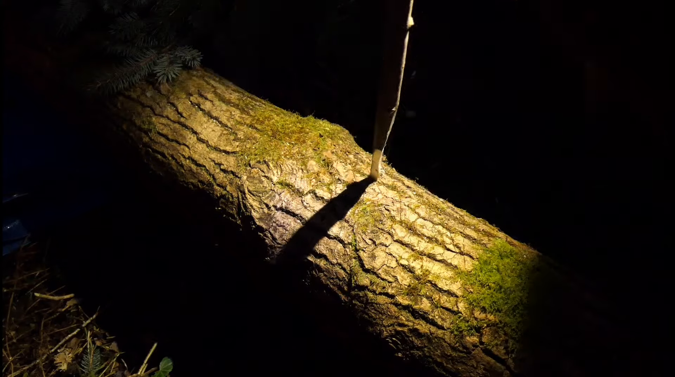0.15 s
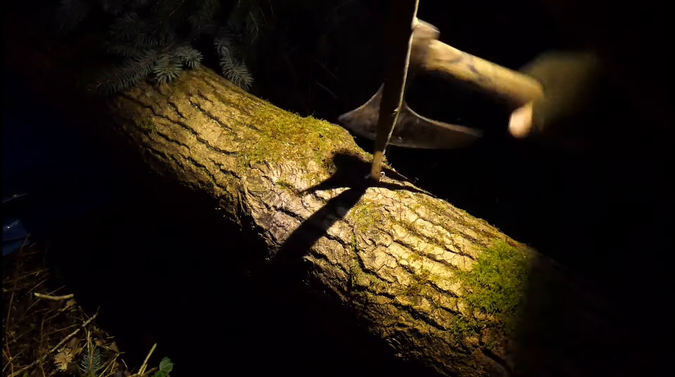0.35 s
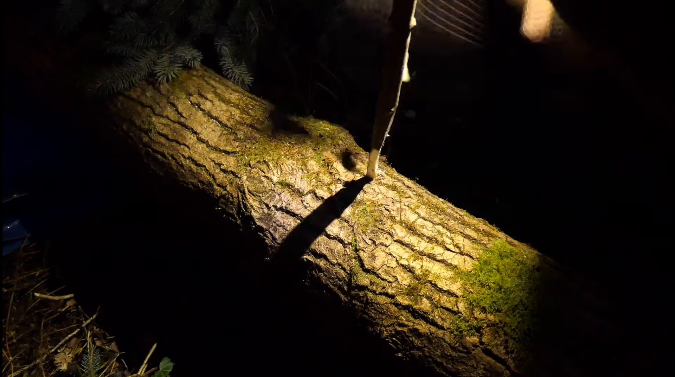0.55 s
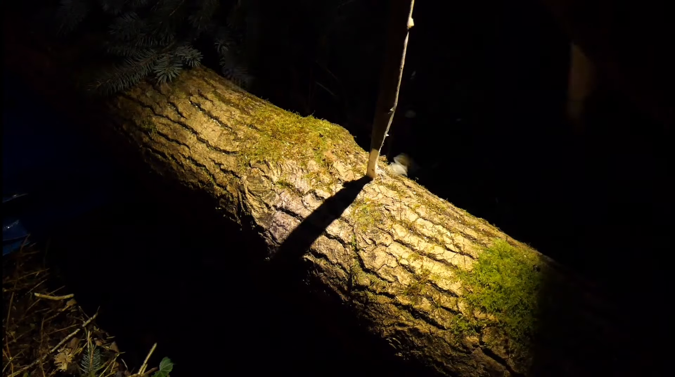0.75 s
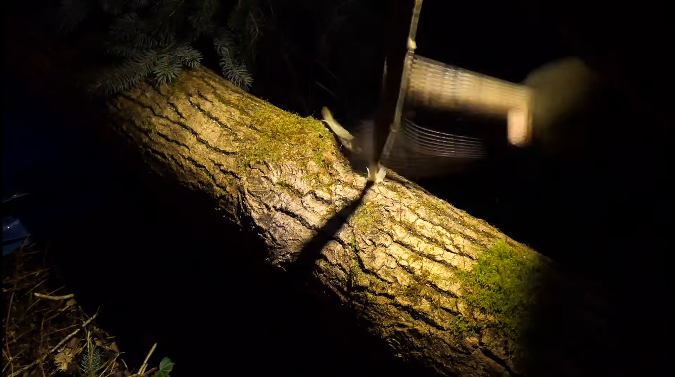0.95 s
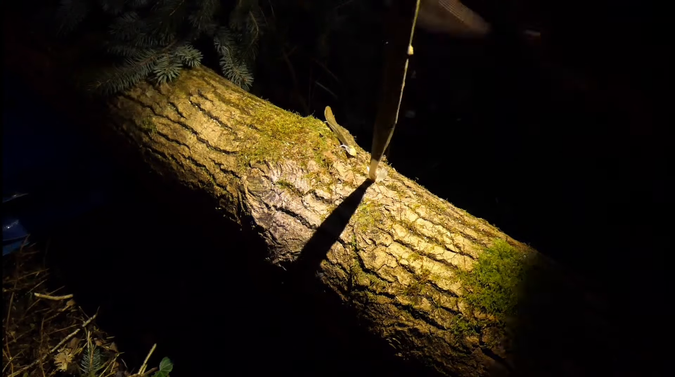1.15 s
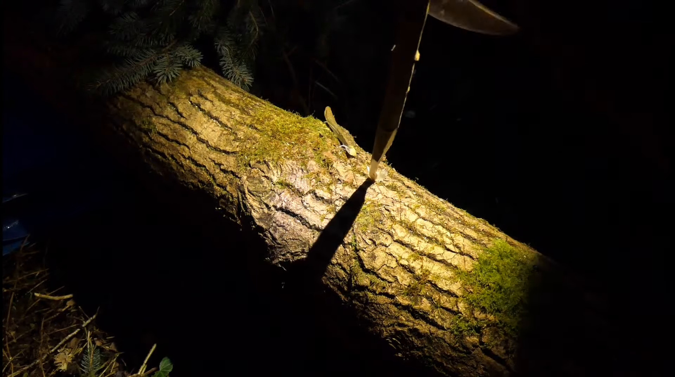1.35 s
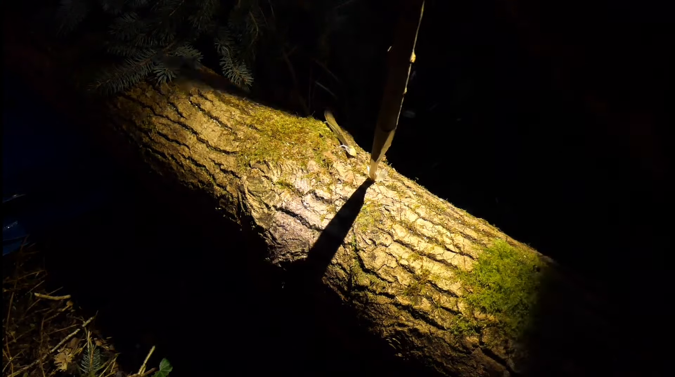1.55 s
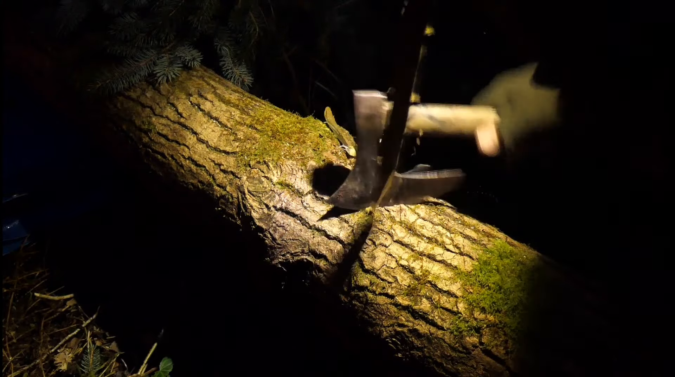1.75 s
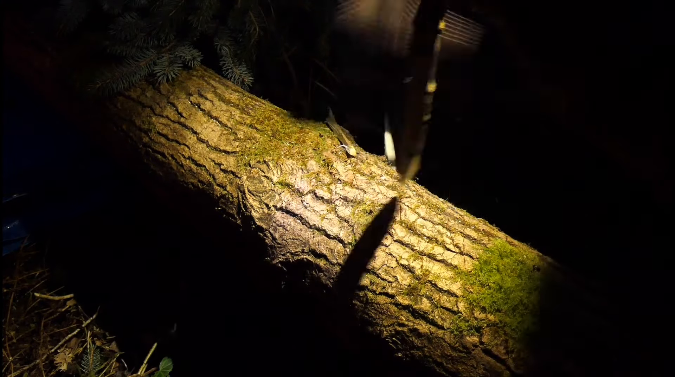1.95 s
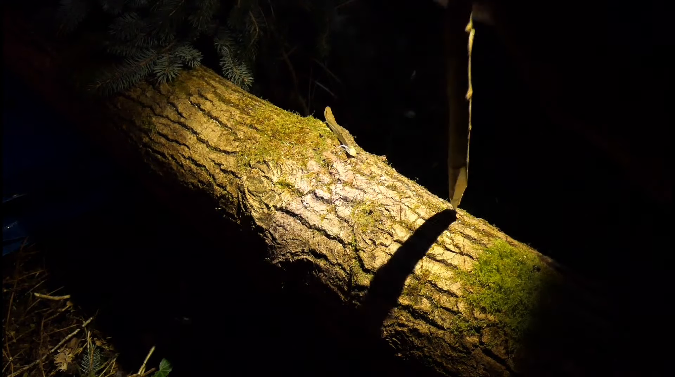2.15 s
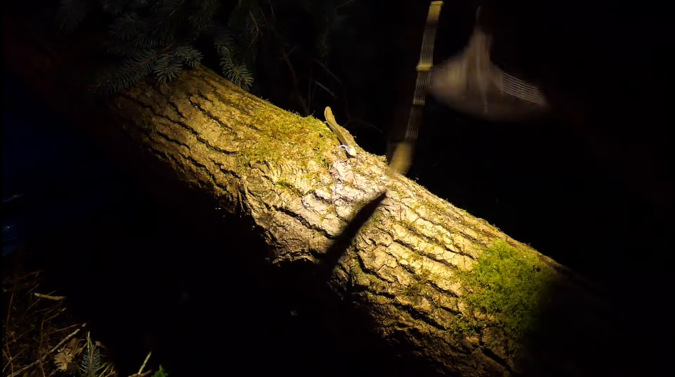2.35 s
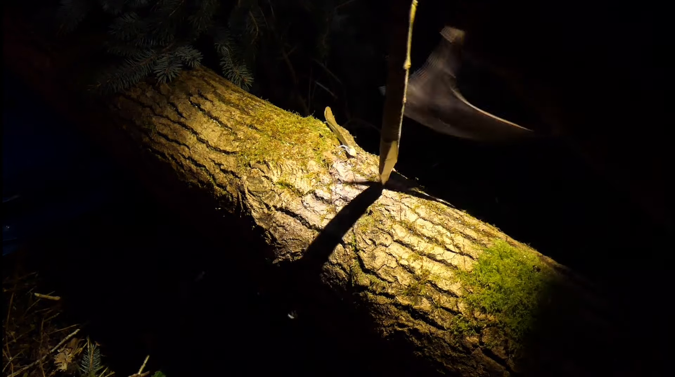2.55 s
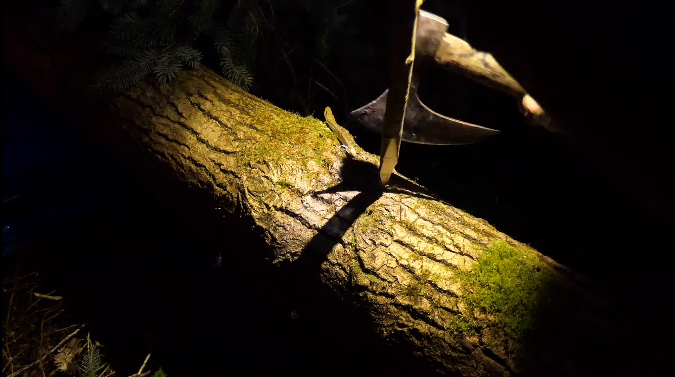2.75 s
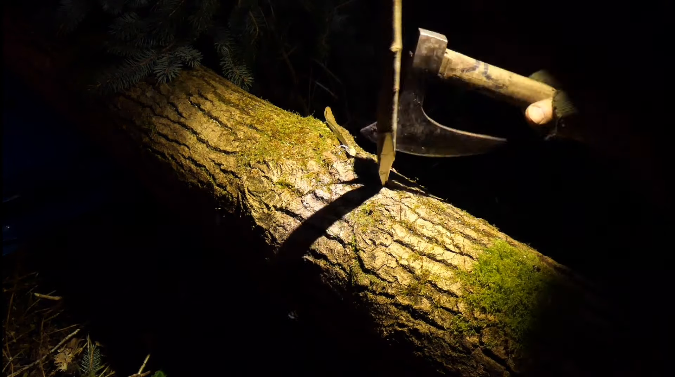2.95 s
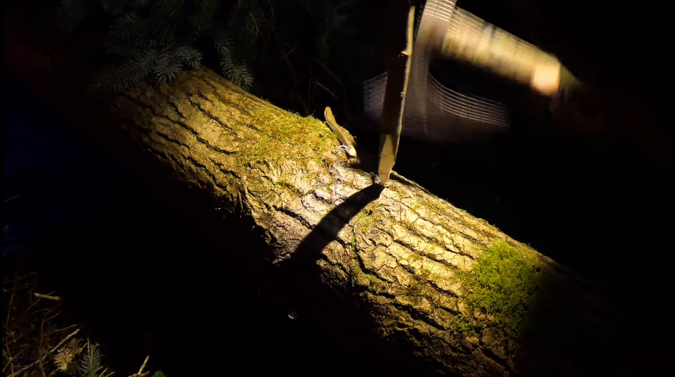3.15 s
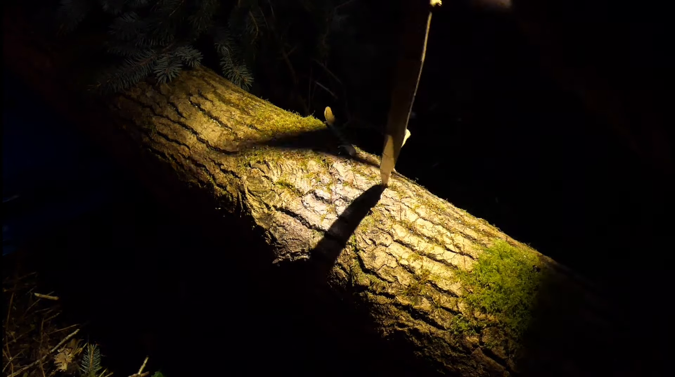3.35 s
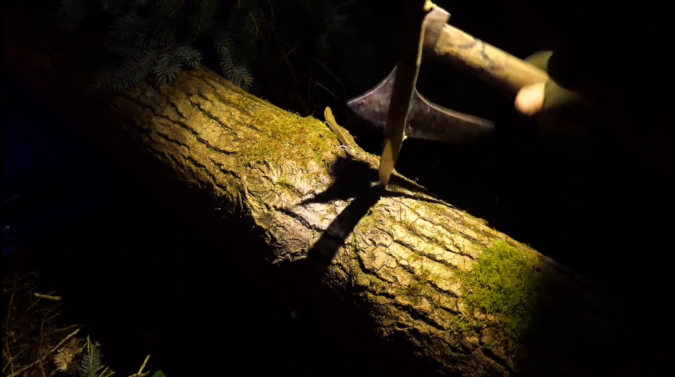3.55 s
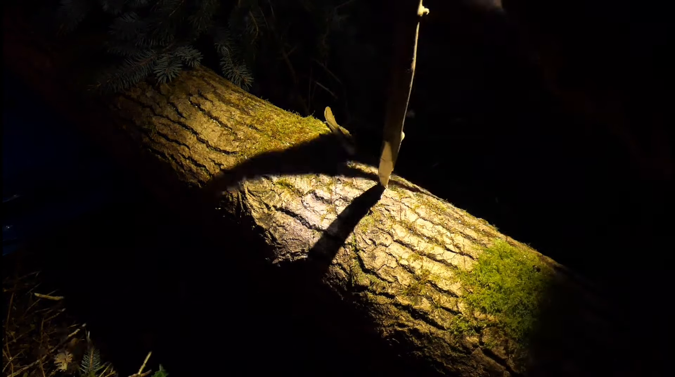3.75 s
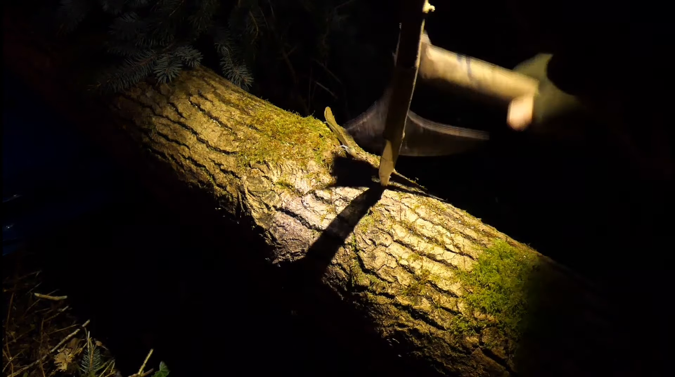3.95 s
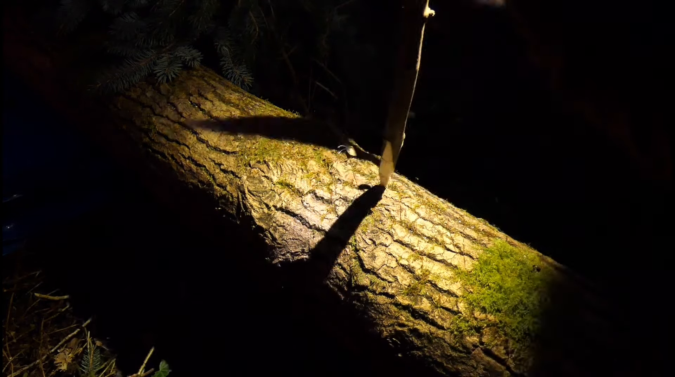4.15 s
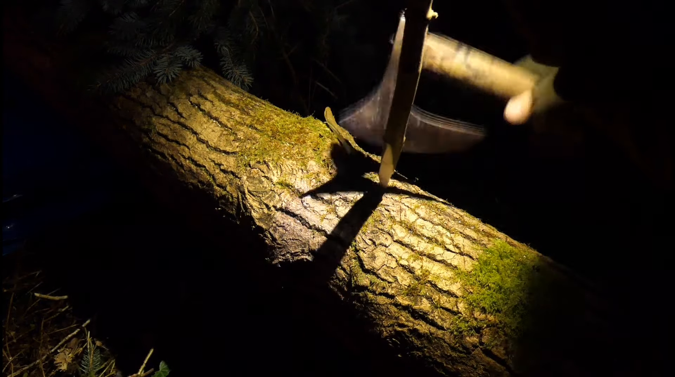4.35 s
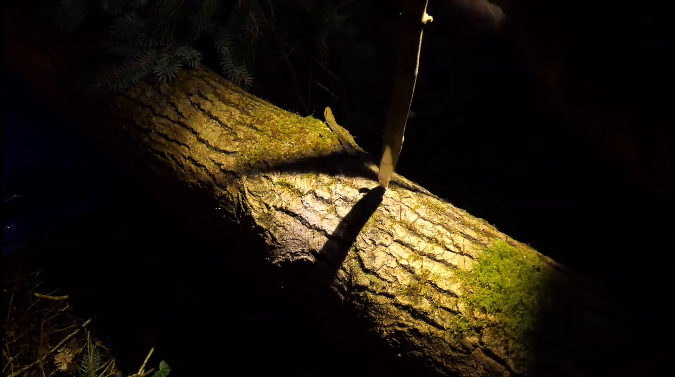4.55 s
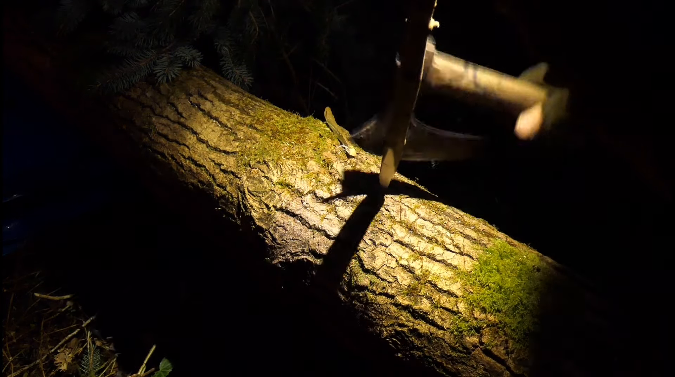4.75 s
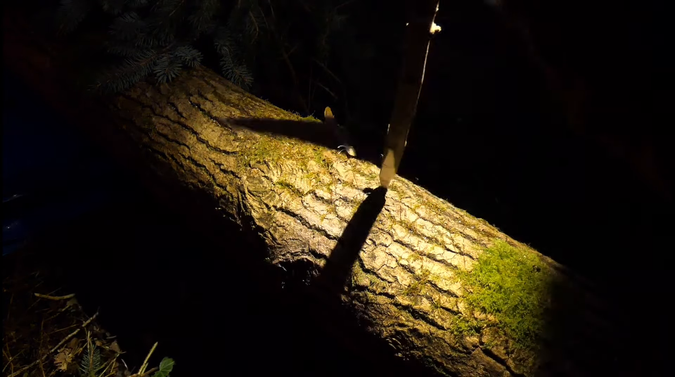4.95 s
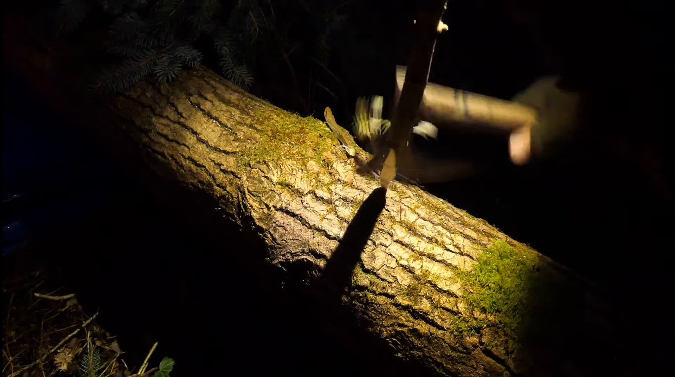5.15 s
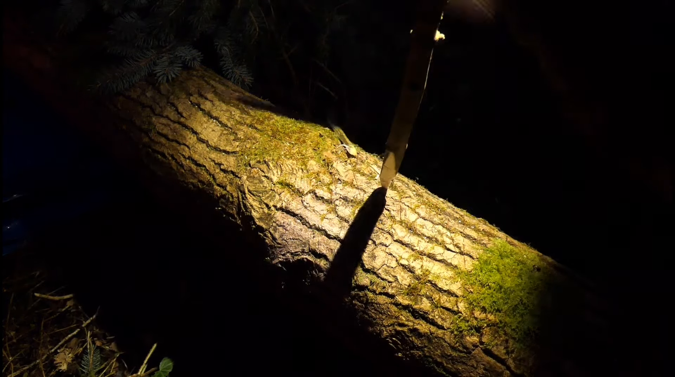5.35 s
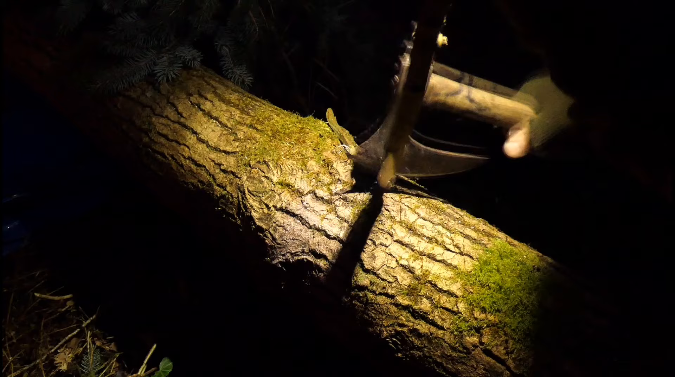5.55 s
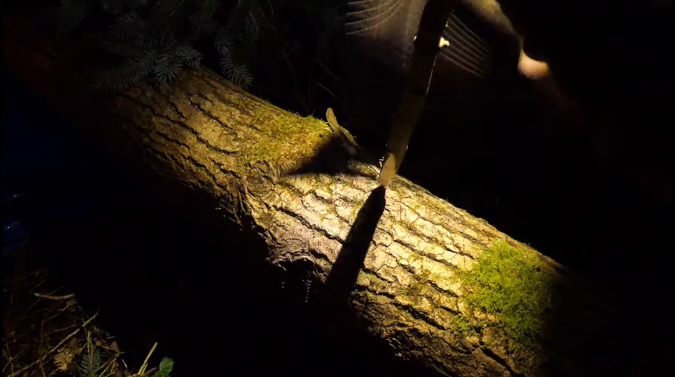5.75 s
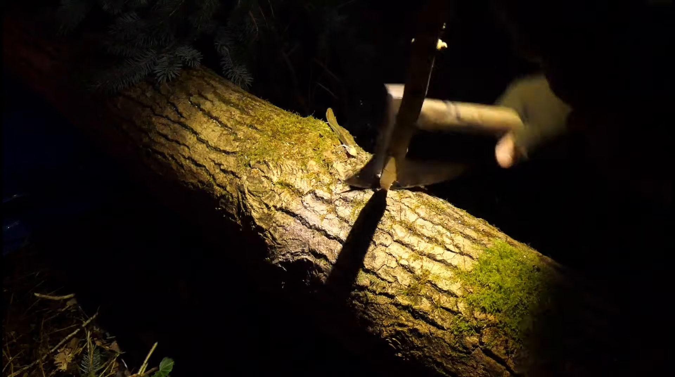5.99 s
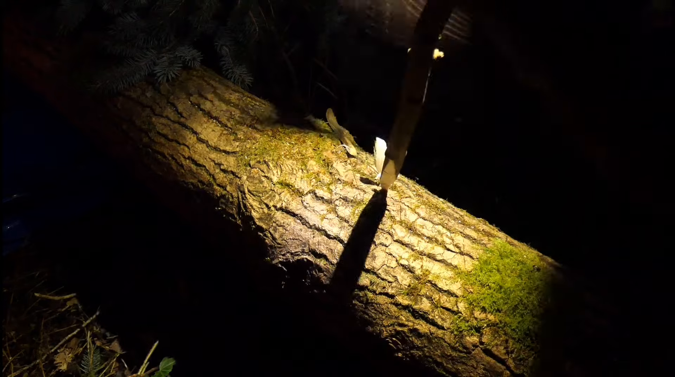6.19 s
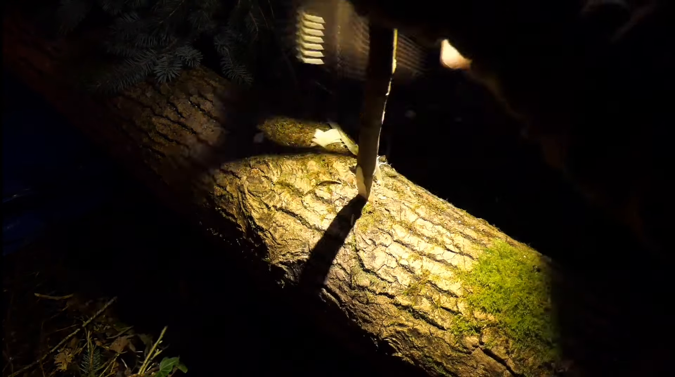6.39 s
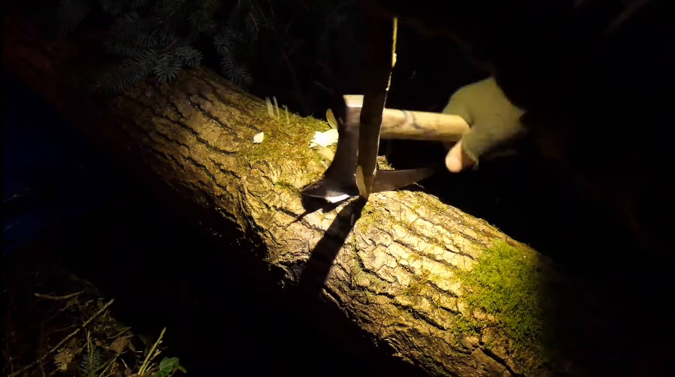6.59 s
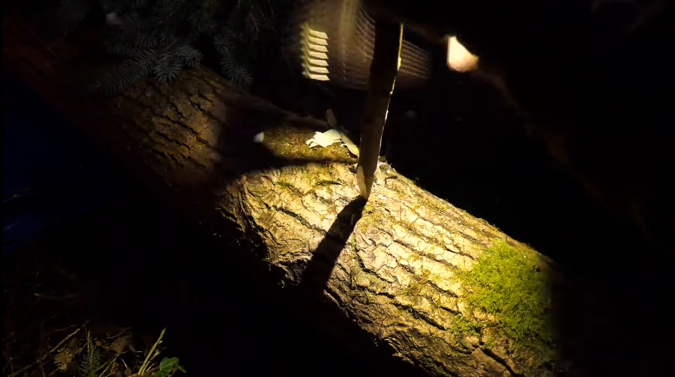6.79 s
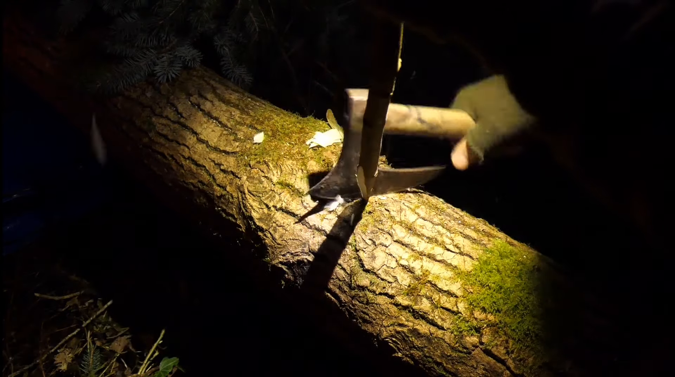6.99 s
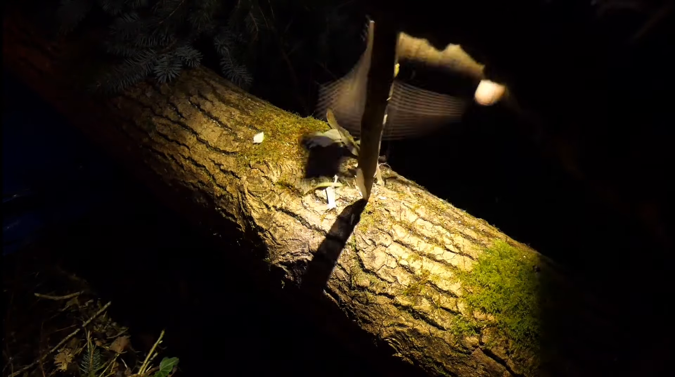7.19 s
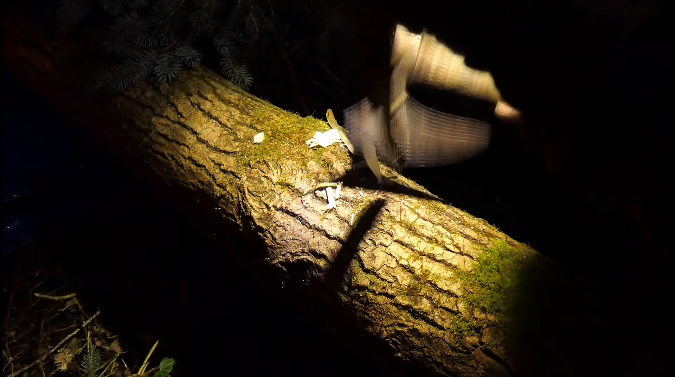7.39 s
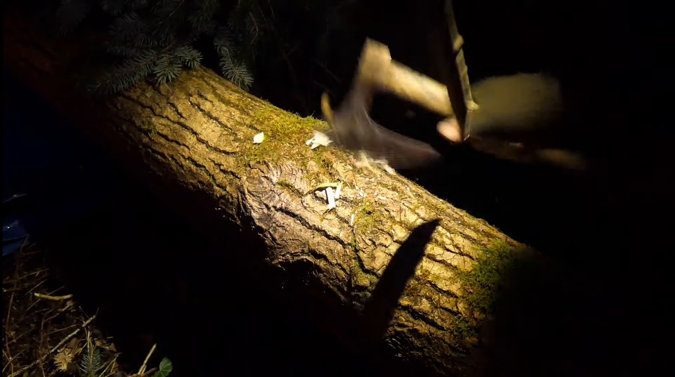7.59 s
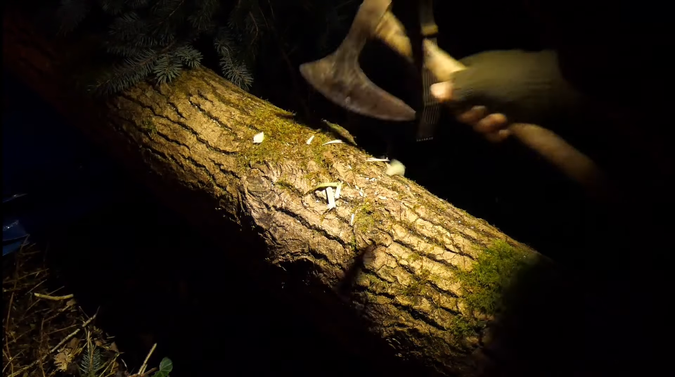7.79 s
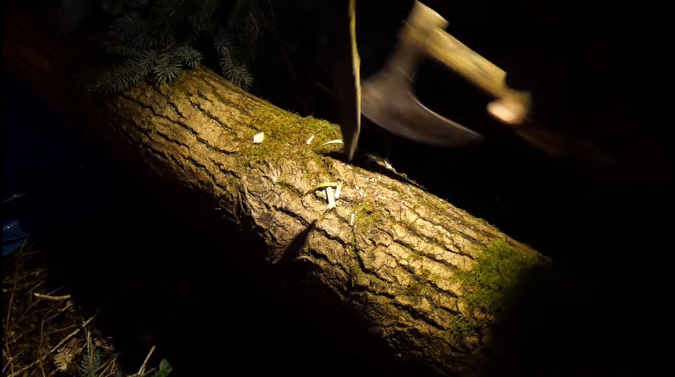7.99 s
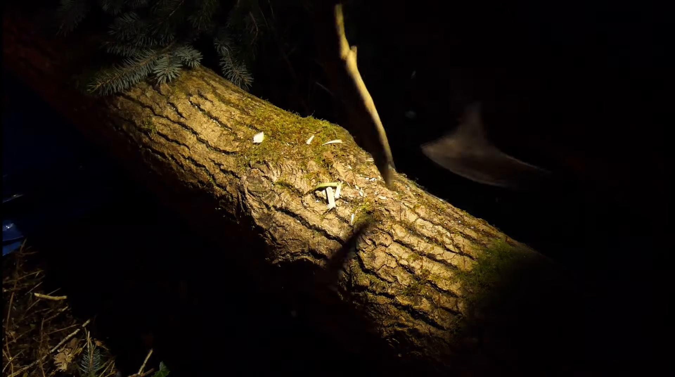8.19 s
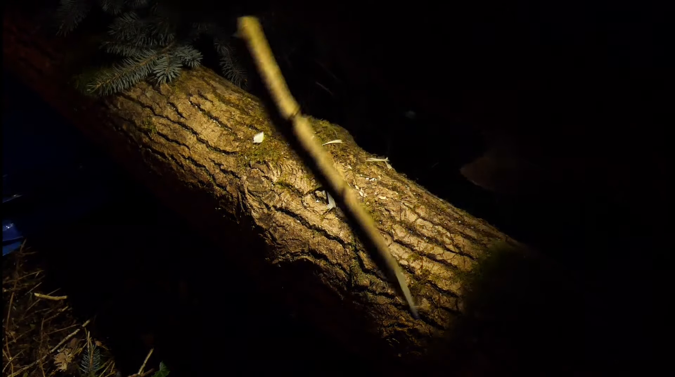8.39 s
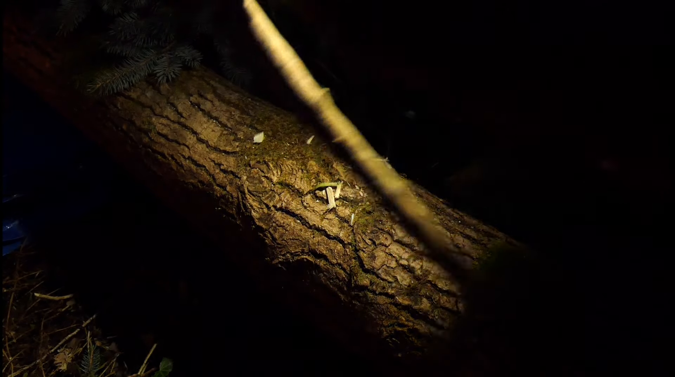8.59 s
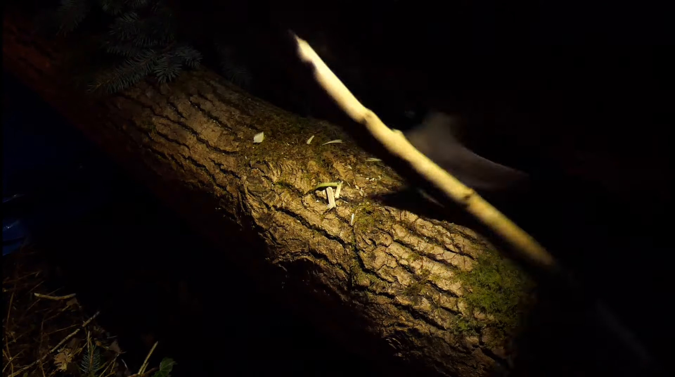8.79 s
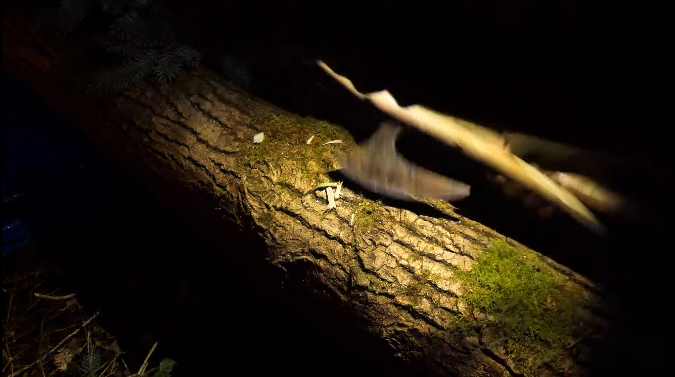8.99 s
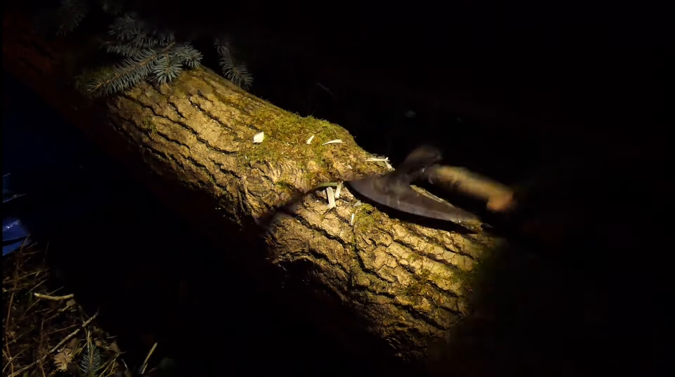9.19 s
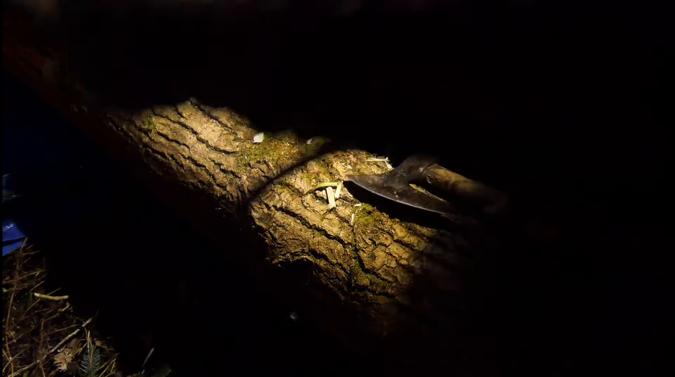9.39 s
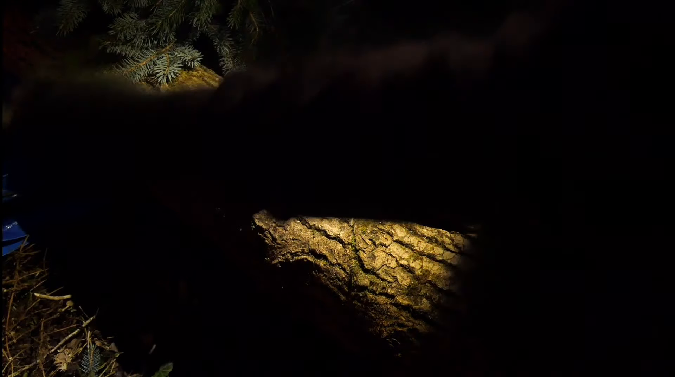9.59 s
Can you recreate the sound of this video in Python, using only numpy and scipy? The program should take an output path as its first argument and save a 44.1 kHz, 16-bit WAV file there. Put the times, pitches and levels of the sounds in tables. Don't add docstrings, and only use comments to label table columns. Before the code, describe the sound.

Close and nearly dry, an axe cracks into a wooden stake standing on a log, about two blows a second with a few pauses. Each bite snaps brightly, tears fibres and ends in a short woody knock and low thud. Blows cease after seven and a half seconds; light taps, rustles and bird whistles remain. Stereo outdoor pickup, soft woodland wash.

```python
import sys
import numpy as np
from scipy import signal
from scipy.fft import rfft, irfft
from scipy.io import wavfile
from scipy.ndimage import uniform_filter1d

SR = 44100
rng = np.random.default_rng(int(sys.argv[2]) if len(sys.argv) > 2 else 0)


def voltage_ratio(level):
    return 10 ** (np.asarray(level, float) / 20)


def wav_record(signal):
    frames = np.transpose(np.atleast_2d(signal))
    bounded = np.clip(frames, -1, 1)
    quanta = np.round(bounded * 32767).astype(np.int16)
    wavfile.write(sys.argv[1], SR, quanta)


N = 424683


def evened(x):
    return x / np.sqrt(np.mean(x ** 2) + 1e-20)


def peaked(x):
    return x / (abs(x).max() + 1e-20)


def read_spectrum(points, hz):
    point_hz, value = np.transpose(points)
    return np.interp(np.log(hz + 1), np.log(point_hz + 1), value)


def add(mix, start_s, sound):
    part = mix[..., max(round(start_s * SR), 0):][..., :sound.shape[-1]]
    part += sound[..., :part.shape[-1]]


def resonate(x, hz, width_hz):
    r = np.exp(-np.pi * width_hz / SR)
    poles = [1, -2 * r * np.cos(2 * np.pi * hz / SR), r * r]
    return signal.lfilter([(1 - r * r) / 2, 0, (r * r - 1) / 2], poles, x)


def high_pass(x, hz):
    return signal.sosfilt(signal.butter(2, hz, "high", fs=SR, output="sos"), x)


# centre_hz, width_hz, level_db
KNOCK_MODES = [(506, 356, 3.5), (1110, 87, 5), (1510, 370, 4.5), (1820, 110, 2.5), (2214, 910, 11.5)]
# centre_hz, width_hz, level_db
CRACK_MODES = [(3060, 350, 9.5), (3500, 120, 12), (3940, 1230, 4.5), (5150, 360, -7)]
# centre_hz, width_hz, level_db
SPLINTER_MODES = [(7600, 200, 2.5), (9930, 620, 3), (10800, 930, 1.5), (12060, 380, 5), (13670, 1000, -1.5),
                  (14500, 1200, -2.5), (11070, 5800, -11)]


def ring_modes(modes, drive, vary):
    shift = 1 - vary * rng.random(len(modes))
    out = 0
    for (hz, width_hz, level_db), k in zip(modes, shift):
        width = 1.51 * width_hz * k
        once = resonate(drive, hz * k, width)
        out = out + voltage_ratio(level_db) * resonate(once, hz * k, width)
    return peaked(out)


def snap(peak_db, knock_db, splinter_db, tear_db, crack_hz, tear_t60_s=0.054):
    t = np.arange(5000) / SR
    mid, side, grain = rng.standard_normal((3, len(t)))
    grain = voltage_ratio(evened(uniform_filter1d(grain, size=30)))
    stop_db = -7 * (t / 0.02) ** 2
    fade_db = tear_db - 60 * t / np.clip(tear_t60_s, 0.005, 0.3) + stop_db
    tearing = voltage_ratio(fade_db) * grain * np.minimum(t / 0.00043, 1)
    click = 1.0 * (t == t[40])
    burst = np.exp(-t / 0.00069) * (t > 0.0004)
    swell = (t / 0.00035) ** 3 * np.exp(-t / 0.00023)
    phase = 2 * np.pi * crack_hz * (1.1345 * t - 60 * t ** 2)
    out = peaked(swell * np.sin(phase))

    def parting(apart, envelope):
        return envelope * (mid + apart * np.outer([1, -1], side))

    knock = ring_modes(KNOCK_MODES, 4 * click + parting(0.2, tearing), vary=0.06)
    fibres = ring_modes(CRACK_MODES, parting(0.3, tearing), vary=0.1)
    splinters = ring_modes(SPLINTER_MODES, parting(0.5, tearing + 1.3 * burst), vary=0.01)
    out = out + voltage_ratio(knock_db) * knock + voltage_ratio(tear_db) * fibres + voltage_ratio(splinter_db) * splinters
    return voltage_ratio(peak_db) * out


# start_s, crack_peak_db, crack_hz, splinter_db re crack, tear_db re crack
BITES = [(0.447, -3, 3470, -14, -21.5), (0.998, -0.5, 3500, -13, -13), (1.8502, -18, 3530, -1, 5),
         (2.8864, -32.5, 3440, -5, -6), (3.6217, -12, 3500, -5.5, -10.5), (4.03, -8, 3676, -18, -15),
         (4.4272, -2, 3750, -14, -18), (4.801, -3.5, 3570, -19.5, -20.5), (5.233, -2, 3886, -21, -16.5),
         (5.709, -0.5, 3540, -19, -14.5), (6.114, -3, 3464, -14.5, -7), (6.3300, -14.5, 3280, -7.5, -3),
         (6.715, -8, 3520, -5.5, -5.5), (7.1113, -16, 3925, 2.5, 4.5), (7.3189, -35, 3960, -3, -19),
         (7.569, -23.5, 3720, -9, 4.5), (7.6325, -36, 4170, -15, 0)]
# start_s, crack_peak_db, knock_db re crack, splinter_db re crack
SLIDES = [(0.4547, -15.5, -4, 5.5), (1.0098, -15.5, 5, -1), (1.0156, -8, -15, -6.5),
          (1.0236, -23, 7.5, -20), (1.8553, -15.5, -4.5, 4), (1.8660, -13, -1.5, -6.5),
          (4.0385, -12.5, 2, -1.5), (4.8044, -10, 1.5, -7), (4.8114, -15, -5, -7), (5.236, -38.5, 8, -0.5),
          (5.246, -10, -1, -16), (5.2465, -14, -31.5, -3), (6.125, -11, -20, -5.5), (6.145, -25.5, -2, 2),
          (6.343, -12.5, -5.5, -8.5), (6.7235, -22.5, -30, 2.5), (7.084, -36, 10, 8.5),
          (7.1147, -20, 0, -5), (7.581, -20, 2, -7), (0.4582, -18, -3, 0.5), (7.633, -31.5, 0.5, -8.5)]
# start_s, peak_db, splinter_db re tick
TICKS = [(0.0312, -38.5, -7), (0.494, -52, 8.5), (0.598, -52, -30), (0.6204, -39.5, -3), (0.6516, -52, 6),
         (1.42, -61, 10), (1.596, -56.5, 13), (1.939, -42.5, 5.5), (1.967, -57, -18.5), (2.328, -49, -2),
         (2.358, -40.5, -2), (2.536, -45, 4.5), (2.5574, -44.5, 0), (2.977, -52, 0), (3.052, -50, -2),
         (3.085, -45, 0), (3.117, -44, 0), (5.123, -45.5, -1), (5.2, -50.5, 10), (6.468, -46, -3),
         (7.544, -37, -10), (7.705, -51, -10), (7.7654, -38.5, -23), (8.02, -54, -5), (8.115, -43, -3),
         (8.15, -41, -3), (8.775, -51, -4), (8.97, -55, 4), (9.1932, -49, -4), (9.333, -50.5, 7),
         (9.4128, -48, 0.5), (9.509, -40.5, 10), (9.5857, -37.5, -36)]


def axe():
    out = np.zeros((2, N))
    delay_s = 0.0008
    for start_s, peak_db, crack_hz, splinter_db, tear_db in BITES:
        knock_db = -7 - 0.63 * max(peak_db, -19)
        add(out, start_s + delay_s, snap(peak_db, knock_db, splinter_db, tear_db, crack_hz))
    for start_s, peak_db, knock_db, splinter_db in SLIDES:
        crack_hz = 3560 * (1 + 0.034 * rng.uniform(-1.1, 1))
        add(out, start_s + delay_s, snap(peak_db, knock_db, splinter_db, -10, crack_hz))
    for start_s, peak_db, splinter_db in TICKS:
        add(out, start_s, snap(peak_db, 0, splinter_db, -5.5, 3820, tear_t60_s=0.077))
    return out


# start_s, peak_db, pitch_hz
BENDS = [(0.447, -24, 1450), (0.996, -19.5, 1550), (1.8482, -19, 1103), (3.623, -19, 1095),
         (4.031, -18, 1130), (4.429, -23.5, 1065), (4.801, -16, 1136), (5.233, -21.5, 1080),
         (5.709, -26.5, 1086), (6.1138, -17.5, 1095), (6.330, -15.5, 1820), (6.716, -21.5, 1510),
         (7.111, -21.5, 1490), (7.319, -38, 794), (7.57, -35, 940)]
# start_s, peak_db, pitch_hz
CLACKS = [(0.4495, -12, 2263), (0.448, -10, 2810), (0.598, -35.5, 2450), (0.997, -13.5, 1825),
          (1.009, -22.5, 2420), (1.8492, -23.5, 1703), (1.851, -27.5, 864), (1.8665, -12, 2170),
          (2.887, -37, 1980), (2.982, -46, 5040), (3.102, -37, 2050), (3.198, -48, 1680),
          (3.6243, -22, 1520), (3.623, -20, 3420), (4.032, -20.5, 975), (4.428, -28, 1450),
          (4.4295, -14, 3280), (4.803, -24, 4160), (4.8008, -22.5, 2270), (5.234, -21.5, 1652),
          (5.2335, -21.5, 3300), (5.248, -19, 2750), (5.71, -9.5, 3390), (5.7102, -27, 2010),
          (5.7104, -23.5, 5660), (6.1148, -13, 2313), (6.115, -19.5, 1482), (6.117, -15, 3390),
          (6.148, -22, 2680), (6.331, -18, 3190), (6.716, -13, 1798), (7.112, -10, 2530),
          (7.1122, -33, 3240), (7.113, -22, 2430), (7.1118, -22, 1790), (7.318, -38, 3400),
          (7.569, -32, 3200), (7.5692, -35, 4500), (9.26, -40, 4650), (9.287, -32, 4330),
          (9.367, -46.5, 990), (9.586, -38, 2490), (0.4472, -11, 2526), (0.9992, -16.5, 2080),
          (1.851, -13.5, 1974), (3.6235, -16, 2140), (4.4297, -23, 2710), (6.1256, -19, 5620),
          (6.1257, -17, 4500), (6.1258, -16, 3300), (6.1493, -30, 2500), (6.7162, -16.5, 2240),
          (7.1125, -31, 2110), (7.569, -32.5, 1480)]


def stake():
    out, t = np.zeros(N), np.arange(3000) / SR
    for start_s, peak_db, hz in BENDS:
        note = voltage_ratio(-60 * t / 0.036) * np.sin(2 * np.pi * hz * t)
        note += voltage_ratio(-8.5 - 60 * t / 0.025) * np.sin(2 * np.pi * 2.02 * hz * t)
        add(out, start_s + 0.0015, voltage_ratio(peak_db) * note * np.minimum(t / 0.00036, 1))
    for start_s, peak_db, hz in CLACKS:
        fade_db = 60 * t * hz / 45
        add(out, start_s, voltage_ratio(peak_db - fade_db) * np.sin(2 * np.pi * hz * t) * np.minimum(t / 0.0015, 1))
    return out


# start_s, peak_db
THUDS = [(0.451, -28.5), (1.026, -32.5), (1.866, -19.5), (2.882, -37), (3.626, -30), (4.04, -31),
         (4.431, -33), (4.812, -26), (5.237, -32.5), (5.712, -27.5), (5.123, -45.5), (6.125, -28.5),
         (6.151, -37.5), (6.346, -17), (6.727, -16), (7.1233, -13), (7.315, -44.5), (7.571, -35.5),
         (7.634, -20.5), (9.415, -40.5), (9.586, -39)]
# pitch_hz, level_db, t60_s
LOG_MODES = [(173, -35, 0.23), (222, -2, 0.029), (293, -11, 0.04), (358, 0, 0.016), (482, -16, 0.035),
             (628, -2, 0.016)]


def log():
    out, t = np.zeros(N), np.arange(14000) / SR
    body = sum(voltage_ratio(db - 60 * t / t60_s) * np.sin(2 * np.pi * hz * t) for hz, db, t60_s in LOG_MODES)
    for start_s, peak_db in THUDS:
        rocking = voltage_ratio(-7 - 60 * t / 0.22) * 0.057 * rng.standard_normal(len(t)) * (t > 0.012)
        force = uniform_filter1d(rocking + (t == t[60]), size=60)
        push = np.diff(force, prepend=0)
        add(out, start_s + 0.0009, voltage_ratio(peak_db) * peaked(signal.fftconvolve(push, body)[:len(t)]))
    return out


# start_s, level_db, cheek_mode_db, high_modes_db
RINGS = [(.002, -73, -13, 3.5), (0.111, -48.5, -22.5, -6.5), (0.461, -67.5, 17.5, -1),
         (0.624, -52.5, -13.5, -4.5), (1.03, -65, 9.5, 5), (1.951, -64, -10, 6), (2.9, -49, -3, -17),
         (2.975, -56, -1, -2), (3.06, -49, 2, -9), (4.052, -56, -5, 2.5), (4.44, -55, -3, -4.5),
         (4.82, -63.5, -1, -3.5), (4.94, -51.5, -6.5, -6.5), (6.127, -51.5, -16.5, -12.5),
         (6.148, -57, -11, -4.5), (7.585, -34, -22, -24), (7.684, -46, -21, -20), (7.757, -47.5, -15, -18),
         (9.24, -58, -10, 6), (9.262, -56, 1, 6.5), (9.332, -67, -13, -1)]
# pitch_hz, level_db, t60_s
STEEL_MODES = [(3240, 0, 0.22), (3950, -4.5, 0.56), (4975, -10.5, 0.89), (5640, -2.5, 0.075),
               (7440, -7.5, 0.077), (7200, -8, 0.16), (9840, -23.5, 0.066), (10950, -19, .1),
               (12170, -13.5, 0.12)]
STILLS = [
    2.93,
    3.0,
    7.705,
]


def steel():
    out, t = np.zeros(N), np.arange(12000) / SR
    wood_touches = [row[0] for row in BITES + SLIDES]
    touches = np.array(wood_touches + list(STILLS) + [N / SR + 1])
    for start_s, ring_db, cheek_db, high_db in RINGS:
        free_s = touches[touches > start_s + 0.021].min() - start_s
        for hz, mode_db, t60_s in STEEL_MODES:
            level_db = ring_db + mode_db + high_db * (hz > 4500) + cheek_db * (3700 < hz < 4500)
            level_db += 1.6 * rng.standard_normal()
            fade_db = 60 * t / min(t60_s, 0.5) + 1500 * np.maximum(t - free_s, 0)
            line = np.sin(2 * np.pi * hz * t) * np.minimum(t / 0.0018, 1)
            add(out, start_s, voltage_ratio(level_db - fade_db) * line)
    return out


# freq_hz, left_right_likeness (-1 to 1)
LIKENESS = [(60, .7), (180, 0.2), (550, -0.4), (1650, 0.4), (4970, 0.6), (15000, 0.4)]


def noise(spectrum, patchy_db):
    frames, hz = N // 256 + 5, np.fft.rfftfreq(1024, 1 / SR)
    a, b, c, d, patches = rng.standard_normal((frames, 513, 5)).T
    patches = uniform_filter1d(patches, size=12, axis=0)
    patches = evened(uniform_filter1d(patches, size=14, axis=1))
    same = np.clip(read_spectrum(LIKENESS, hz), -1, 1)[:, None]
    left, other = a + 1j * b, c + 1j * d
    z = np.array([left, same * left + np.sqrt(1 - same ** 2) * other])
    z *= voltage_ratio(read_spectrum(spectrum, hz)[:, None] + patchy_db * patches)
    return evened(signal.istft(z, nperseg=1024, noverlap=768)[1][:, :N])


# start_s, length_s, top_db, top_place (0-1)
RUSTLES = [(0.0, 0.039, -51, 0), (0.059, 0.065, -55, 0.9), (0.563, 0.1, -57.5, 0.6),
           (1.927, 0.06, -52.5, 0.18), (2.534, .05, -53, 0.08), (2.881, 0.042, -45, 0.4),
           (2.929, 0.17, -56, 0.37), (3.03, 0.13, -49, 0.43), (3.148, 0.11, -59, 0.46),
           (4.49, 0.078, -62, 0.4), (4.926, 0.032, -49.5, 0.44), (7.593, 0.11, -54, 0.3),
           (7.665, 0.15, -51, 0.35), (7.953, 0.15, -56, 0.62), (8.072, 0.13, -49, 0.48),
           (8.192, 0.08, -61, 0.17), (9.186, 0.093, -56, 1), (9.256, 0.17, -59, 0.24)]
# freq_hz, level_db per Hz
RUB = [(120, -33), (200, 0), (590, -11.5), (2400, -2.5), (4900, -4.5), (6300, -19), (12600, -11),
       (16000, -21)]


def rustle():
    out = np.zeros((2, N))
    grains = voltage_ratio(2.5 * evened(uniform_filter1d(rng.standard_normal(N), size=150)))
    rub = evened(noise(RUB, patchy_db=3) * grains)
    for start_s, length_s, top_db, place in RUSTLES:
        s = start_s + length_s * np.array([0, np.clip(place, 0, 1), 1])
        db = top_db + np.array([-15, 0, -15])
        at = np.arange(round(s[0] * SR), min(round(s[-1] * SR), N))
        level = voltage_ratio(np.interp(at / SR, s, db) + 5.5)
        out[:, at] += level * rub[:, at] * signal.windows.tukey(len(at), 0.2)
    return out


def tone(s, hz, db, rate_hz=0, swing=0, throb_db=0, overtone_db=-60, broken_db=4.0):
    t = np.arange(s[0], s[-1], 1 / SR)
    drift, flutter = (evened(uniform_filter1d(v, size=250)) for v in rng.standard_normal((2, len(t))))
    beat = 2 * np.pi * rate_hz * t + 0.14 * drift
    sweep = 0.6 * np.sin(beat) + signal.sawtooth(2 * beat, 0.7)
    path = uniform_filter1d(np.interp(t, s, hz), size=150, mode="nearest")
    pitch = path * (1 + swing * sweep + 0.004 * drift)
    level = voltage_ratio(np.interp(t, s, db) + broken_db * flutter - throb_db * sweep ** 2)
    level *= signal.windows.tukey(len(t), min(0.008 / (t[-1] - t[0]), 1))
    turn = 2 * np.pi * np.cumsum(pitch) / SR
    return s[0], np.sqrt(2) * level * (np.sin(turn) + voltage_ratio(overtone_db) * np.sin(2 * turn))


# start_s, level_db, centre_hz
BUZZ = [
    (5.39, -53, 4660),
    (5.43, -45.5, 4680),
    (5.548, -44, 4720),
    (5.7, -51.5, 4840),
    (5.882, -51.5, 4760),
    (5.97, -65, 4650),
]
# place (0-1), pitch re centre, level_db
TURN = [
    (.08, .8, -20),
    (.25, .95, -2),
    (.37, 1.08, -1),
    (.47, .94, -2),
    (.6, .85, -13),
    (.72, 1.21, -8),
    (.85, 1.01, 0),
    (.98, .8, -14),
]


def trill():
    place, pitch, dip_db = np.transpose(TURN)
    s, db, hz = np.transpose(BUZZ)
    turns = 10
    at = (5.383 + 0.0605 * (np.arange(turns)[:, None] + place)).ravel()
    path_hz = np.interp(at, s, hz) * np.tile(pitch, turns)
    path_db = np.interp(at, s, db) + np.tile(dip_db, turns)
    return tone(at, path_hz, path_db, rate_hz=70, swing=0.045, broken_db=3.5)


# (time_s, pitch_hz)
NOTES = [
    (-65, -5, [(1.13, 3500), (1.18, 3510), (1.285, 3530)]),
    (-57.5, -15, [(1.29, 3560), (1.305, 3700), (1.36, 3590)]),
    (-44, -7.5, [(7.028, 4860), (7.04, 4720), (7.07, 4750), (7.088, 5160)]),
    (-49, -5, [(7.135, 4900), (7.17, 4740), (7.185, 5800)]),
    (-44, -2.5, [(7.396, 3720), (7.404, 3450), (7.416, 3800), (7.432, 3280), (7.447, 3740), (7.456, 4570)]),
    (-43, -7, [(7.505, 4460), (7.52, 4120), (7.535, 4250), (7.548, 4670), (7.563, 5580)]),
    (-42.5, -8.5, [(7.62, 4410), (7.632, 4250), (7.65, 4450), (7.668, 4540), (7.677, 4770)]),
    (-45, -5, [(8.651, 3090), (8.662, 3434), (8.672, 3150), (8.7, 3267), (8.75, 3212), (8.9, 3102), (8.985, 3016)]),
    (-48, -16, [(8.644, 3810), (8.655, 4200), (8.668, 4060), (8.68, 3860), (8.7, 3810), (8.74, 3850), (8.8, 3740)]),
]
# start_s, length_s, from_hz, to_hz, level_db
GLIDES = [(0.3, .03, 3400, 3650, -67), (1.425, .04, 3480, 3520, -68), (2.09, .016, 3170, 3340, -60),
          (2.182, .04, 3420, 3320, -55), (2.23, .2, 3380, 3330, -67), (2.638, .064, 5850, 3250, -62),
          (2.842, .015, 5600, 5300, -68), (2.858, .03, 4600, 4300, -67), (3.15, .028, 3750, 3250, -54),
          (3.249, .022, 3420, 3250, -58), (6.222, .032, 4600, 5480, -61), (6.285, .018, 6100, 5750, -62),
          (6.303, .02, 5750, 4200, -58), (6.482, .05, 4400, 4560, -63), (6.54, .06, 3950, 3900, -66),
          (6.766, .016, 5300, 4900, -65), (6.83, .03, 3900, 3750, -65), (6.49, .07, 6700, 6800, -63),
          (6.589, .021, 5600, 5000, -63), (6.62, .06, 3950, 3800, -66), (6.841, .035, 4700, 3270, -65),
          (6.9, .052, 7300, 5900, -64), (6.952, .03, 5900, 4740, -58), (7.073, .021, 4380, 3850, -60),
          (7.695, .02, 4700, 4200, -53), (7.76, .14, 3750, 3750, -66), (7.94, .03, 3760, 3750, -62),
          (8.11, .05, 8000, 7900, -63), (8.956, .26, 1933, 1855, -67), (9.07, .08, 3450, 3650, -67),
          (9.185, .02, 3600, 3700, -65)]
# start_s, length_s, centre_hz, level_db
THIN = [
    (6.561, 0.12, 6330, -57),
    (6.586, 0.1, 6680, -54),
    (6.834, 0.07, 7800, -54),
    (7.251, 0.27, 6530, -53),
    (8.201, 0.11, 8030, -47.5),
    (8.299, 0.068, 7600, -45),
    (8.523, 0.11, 7860, -45),
]


def birds():
    out = np.zeros(N)
    for level_db, sag_db, path in NOTES:
        s, hz = np.transpose(path)
        db = level_db + sag_db * (s - s[0]) / (s[-1] - s[0])
        add(out, *tone(s, hz, db, broken_db=2.2))
    for s, length_s, from_hz, to_hz, db in GLIDES:
        add(out, *tone([s, s + length_s], [from_hz, to_hz], [db, db], broken_db=3))
    for s in 4.978 + 0.0713 * np.arange(4):
        add(out, *tone([s, s + 0.015], [3150, 3750], [-56, -56]))
    add(out, *trill())
    for s, length_s, hz, db in THIN:
        add(out, *tone([s, s + length_s], [hz, 0.97 * hz], [db, db - 32.5],
                       rate_hz=42, swing=0.095, throb_db=8.2, overtone_db=-10.5))
    return out


# freq_hz, t60_s
WOODS = [(200, 0.17), (2000, 0.32), (5000, 0.68), (12000, 0.81)]


def woods(x):
    taps = np.zeros((2, SR))
    at = np.arange(500, SR - 20, 20) + rng.integers(0, 20, (2, (SR - 501) // 20))
    np.put_along_axis(taps, at, rng.choice([-1., 1.], at.shape), 1)
    taps += 0.075 * taps[::-1]
    hz, t, z = signal.stft(taps, SR, nperseg=256)
    fade_db = 60 * t / read_spectrum(WOODS, hz)[:, None]
    tail = signal.istft(z * voltage_ratio(-fade_db), SR, nperseg=256)[1]
    return signal.fftconvolve(x[None], tail / np.linalg.norm(tail[0]), axes=1)[:, :N]


# freq_hz, left_lead_rad
PORT_LEAD = [(0, 0.78), (5600, 0.16), (6370, 1), (7750, 0.3), (9560, 0.69), (10600, 0.62), (16200, 0.059)]
# freq_hz, left_minus_right_db
PORT_TILT = [(60, -1.5), (180, 1.5), (550, -3.5), (1650, -1), (4970, 0), (15000, 1)]


def ports(x):
    hz, side = np.fft.rfftfreq(N, 1 / SR), np.array([[0.5], [-0.5]])
    balance = voltage_ratio(side * read_spectrum(PORT_TILT, hz))
    lead = np.exp(1j * side * read_spectrum(PORT_LEAD, hz))
    return irfft(rfft(x) * balance * lead, N)


def litter():
    size = voltage_ratio(-66 + 4 * np.minimum(rng.exponential(1, N), 3)) * (rng.random(N) < 30 / SR)
    tick = rng.standard_normal((2, 200)) * np.exp(-np.arange(200) / 50)
    return high_pass(signal.oaconvolve(size[None], tick)[:, :N], 5000)


# freq_hz, level_db per Hz
WASH = [(22, -49.5), (59, 1.5), (189, 0), (569, -6.5), (700, -11.5), (3400, -13.5), (5450, -28),
        (14000, -25.5)]


def wash():
    return voltage_ratio(-55.5) * noise(WASH, patchy_db=2.5)


def scene():
    near = axe() + stake() + log() + steel()
    far = birds()
    echoes = woods(voltage_ratio(-31.5) * near.mean(0) + voltage_ratio(1.1) * far)
    placed = ports(near) + far * voltage_ratio([[-3], [-1.5]])
    return placed + echoes + rustle() + wash() + litter()


def drop_masked_treble(x):
    hz, _, z = signal.stft(x, SR, nperseg=1024)
    power = uniform_filter1d((abs(z) ** 2).mean(0), size=9, axis=0)
    level_db = 10 * np.log10(uniform_filter1d(power, size=5, axis=1) + 1e-20)
    masker_db = np.maximum.accumulate(np.where(hz[:, None] > 4700, level_db, -300), axis=0)
    faint = level_db < np.median(level_db, axis=1, keepdims=True) + 3
    masked = level_db < masker_db - 13
    shut = faint & masked & ((hz > 6500) & (hz < 8800))[:, None]
    closed = rng.random((level_db.shape[1], 65)).T > 0.2
    shut &= np.repeat(closed, 8, axis=0)[:513]
    return signal.istft(z * np.where(shut, 0.03, 1), SR, nperseg=1024)[1][:, :N]


# centre_hz, width_hz, depth (0-1)
NOTCHES = [(2985, 312, 1)]


def housing(x):
    for hz, width_hz, depth in NOTCHES:
        x = x - depth * resonate(x, hz, width_hz)
    return x


def roll_off(x):
    return signal.sosfilt(signal.butter(12, 16650, fs=SR, output="sos"), x)


def record(dry):
    x = high_pass(dry, 110)
    x = signal.sosfilt(signal.cheby1(10, 1, 15350, "low", fs=SR, output="sos"), x)
    x = 1.186 * np.tanh(housing(x) / 0.97)
    mix = drop_masked_treble(x)
    return roll_off(mix)


dry = scene()
out = record(dry)
wav_record(out)
```